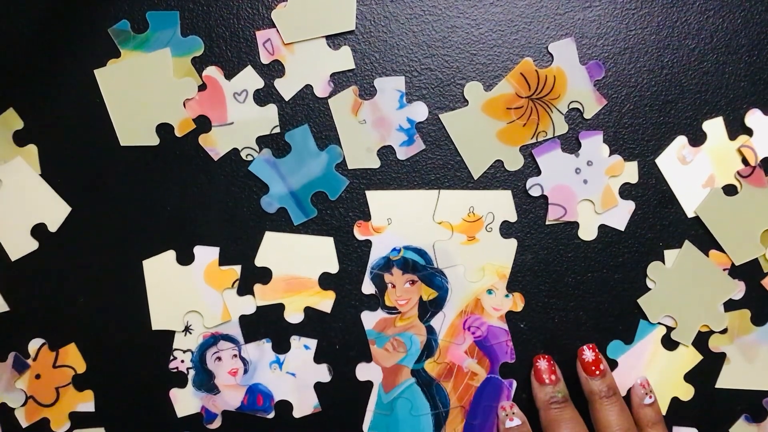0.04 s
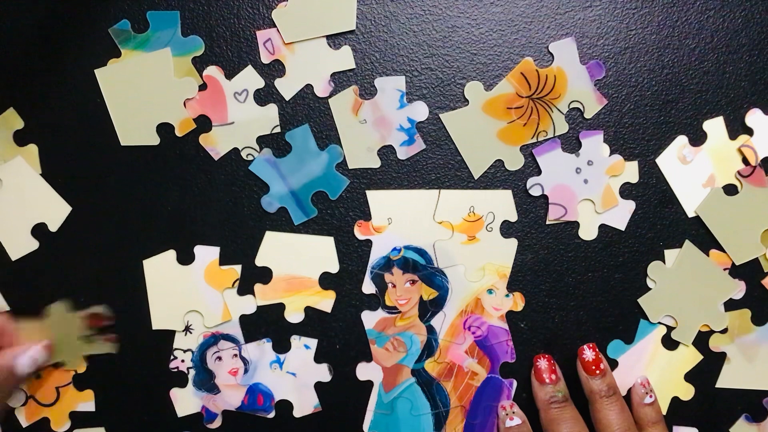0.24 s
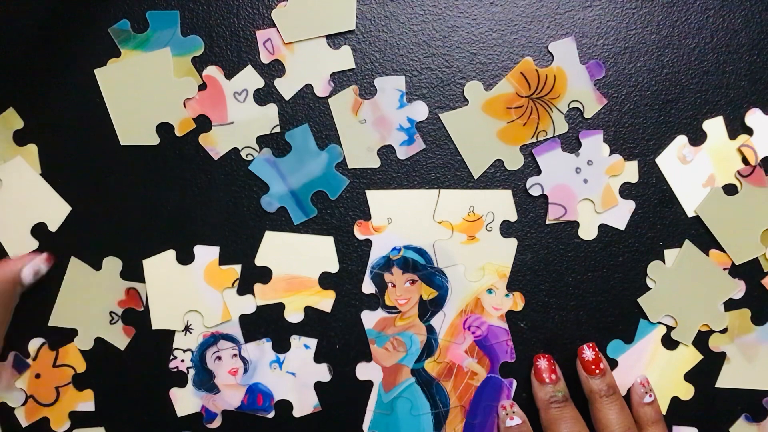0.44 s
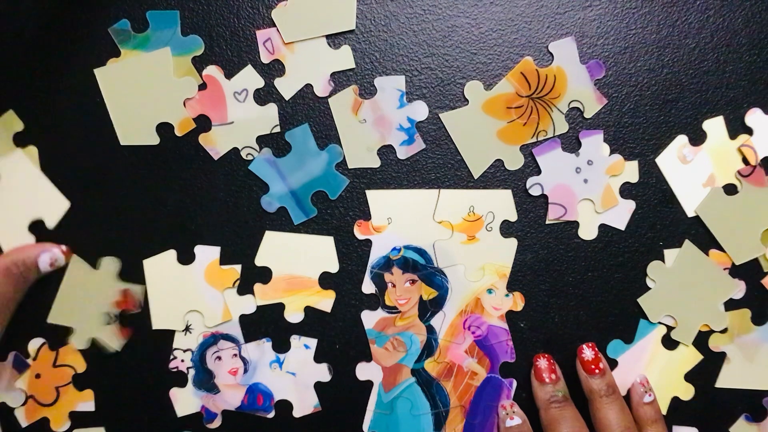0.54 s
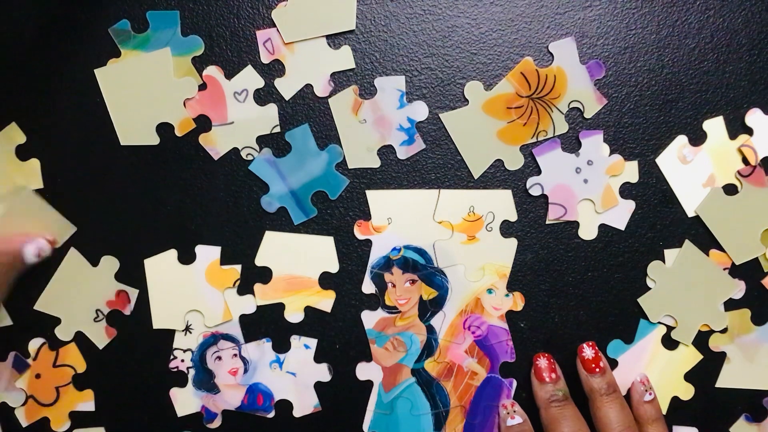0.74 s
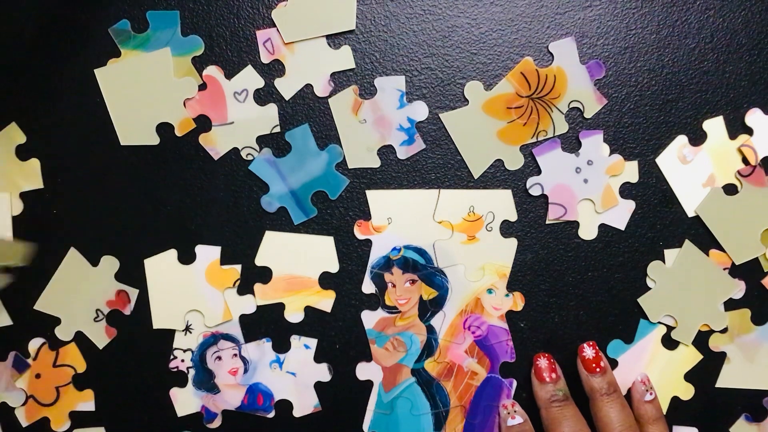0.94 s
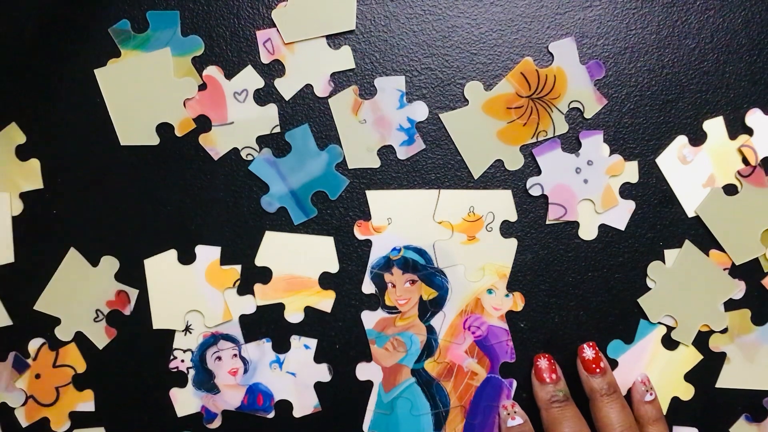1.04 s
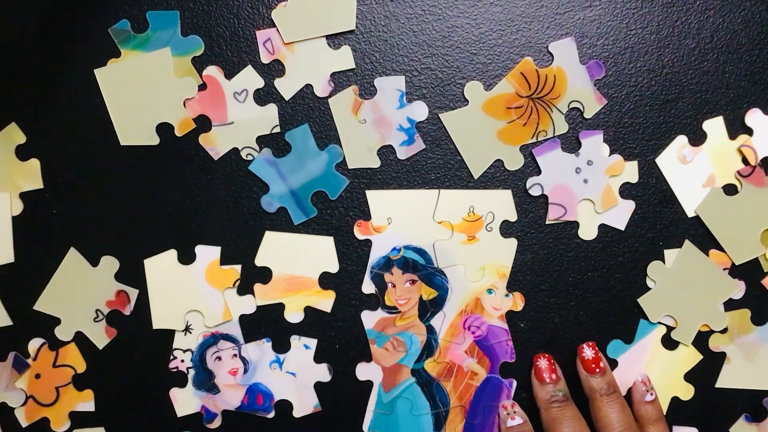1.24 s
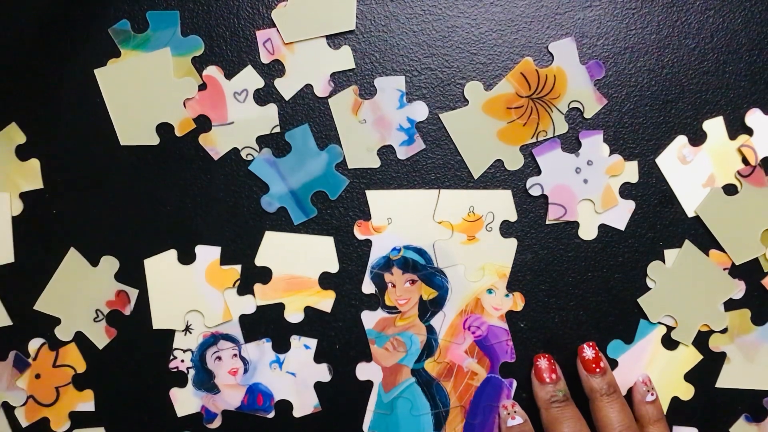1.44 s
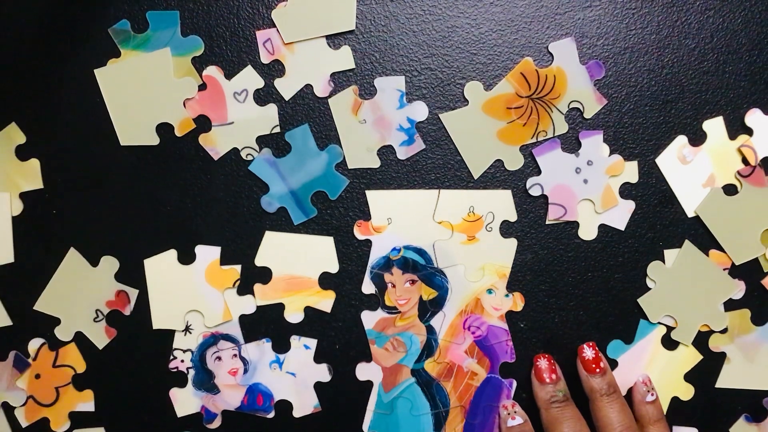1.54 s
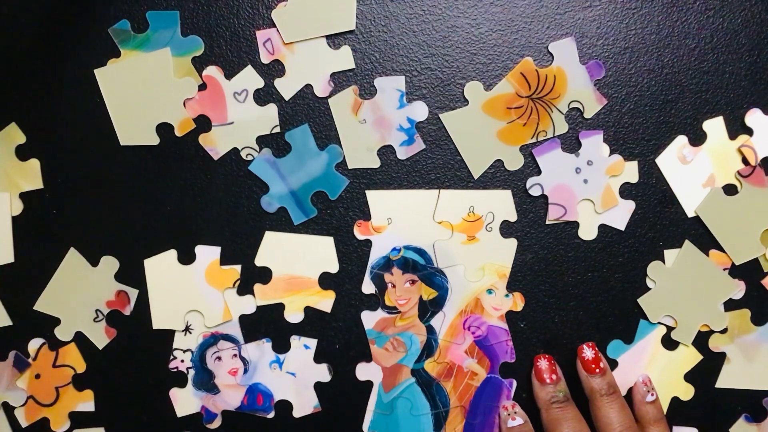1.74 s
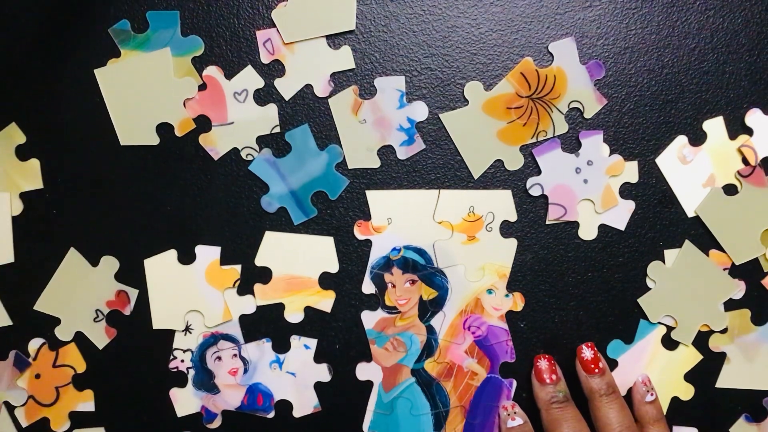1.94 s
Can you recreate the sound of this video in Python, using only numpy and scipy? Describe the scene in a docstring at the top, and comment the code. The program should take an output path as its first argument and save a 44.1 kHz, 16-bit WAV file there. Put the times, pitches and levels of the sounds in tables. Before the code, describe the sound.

Cardboard puzzle pieces are handled on a hard table, giving dry clicks with dull knocks from about 0.2 to 0.5 seconds. Around 0.55 one piece is pushed along with a short, low scrape, then snaps down flat at 0.7. After a pause with only faint room hush, soft touches come near 1.35 seconds, and a light slide with two small taps around 1.7 to 1.8.

```python
"""Puzzle pieces on a table

Cardboard puzzle pieces are handled on a hard table in a small, quiet room. Each contact
is a dry click of card, a knock of the tabletop and a low thump of the whole table.
One piece is pushed along, scraping over the grain, and snaps down flat.
After a pause come a few soft touches and a light slide."""
import sys
import numpy as np
from scipy import signal
from scipy.fft import rfft, irfft
from scipy.io import wavfile
from scipy.ndimage import uniform_filter1d

SR = 44100
rng = np.random.default_rng(int(sys.argv[2]) if len(sys.argv) > 2 else 0)


def persist_wave(psi):
    """Save psi, clipped to +-1, as 16-bit WAV."""
    counts = np.round(np.clip(psi, -1, 1) * 32767).astype(np.int16)
    wavfile.write(sys.argv[1], SR, np.atleast_2d(counts).T)


N = 88200
T = np.arange(SR // 2) / SR  # half a second of time for one short sound

# The room's steady hush. Each row: frequency in Hz, relative level in dB.
HUSH_COLOUR = [(15, -85), (25, -36.5), (50, -9.5), (70, 0), (110, -8), (180, -2), (215, -8.5), (260, -1),
               (330, -7.5), (430, -9), (650, -10), (780, -8), (960, -16), (1330, -10), (1550, -18.5),
               (2500, -18.5), (5140, -28), (8140, -32), (16000, -36)]
# Echoes from things close by. Each row: delay in seconds, level in dB.
EARLY_ECHOES = [(.0052, -24), (.0083, -17.5), (0.0124, -22), (0.0153, -23)]
# How long the room rings. Each row: frequency in Hz, seconds to fade by 60 dB.
ROOM_FADE = [(100, 0.56), (400, 0.4075), (1500, 0.15), (3200, 0.38), (7000, 0.44), (15000, 0.35)]
# The tone of the room's echo. Each row: frequency in Hz, gain in dB.
ROOM_COLOUR = [(80, -14.5), (400, -13), (1000, -5), (2000, -9), (2700, -13), (3300, -14), (4000, -12.5),
               (6000, -18.5), (10000, -19), (15000, -20.5)]
# A fingertip's stroke: start in seconds, length in seconds, level in dB, centre in Hz, width in Hz.
FINGER_BRUSH = (1.01, .34, -77.5, 5250, 400)
# Thin, very high squeaks. Each row: start in seconds, level in dB.
HIGH_SQUEAKS = [(0.092, -60.5), (0.26, -63.5), (.408, -68), (1.088, -70)]
# Pushes of a piece. Each row: start in seconds, length in seconds, scrape level in dB,
# rub level in dB, judder level in dB, change of level over the stroke in dB.
PUSHES = [(.0, 0.14, -69, -62, -62.5, -15), (.27, .07, -75.5, -69, -80, 8),
          (0.546, .08, -48.5, -42, -36.5, -6.5), (0.624, 0.056, -61, -52, -48, -4.5),
          (1.676, 0.12, -73, -60.5, -72, 5)]
# The whole table's low tones. Each row: pitch in Hz, relative level in dB, seconds to fade by 60 dB.
TABLE_TONES = [(75.2, -14, 0.32), (97.5, 3, 0.27), (115, -5.5, 0.1574), (160.5, 7.5, 0.23),
               (177, -11.5, 0.13)]
# The tabletop's tones. Each row: pitch in Hz, relative level in dB, seconds to fade by 60 dB.
TABLETOP_TONES = [(262.3, -3.5, 0.074), (285.8, -3.5, .11), (358.5, -4.5, 0.045), (425, 2, .06),
                  (528.4, 2.5, 0.031), (614, 2, 0.044), (687, -11, 0.016), (776, -4.5, .07),
                  (872, -11, 0.071), (975, -13, 0.11)]
# A piece's own tones. Each row: pitch in Hz, relative level in dB, seconds to fade by 60 dB.
PIECE_TONES = [(2096, -4.5, 0.055), (2530, -6.5, 0.16), (2943, 2, 0.17), (3150, -2, .06), (3355, -5.5, .08),
               (3477, 0.5, .08), (4570, 0, 0.029), (5050, -10.5, 0.051), (5500, -5.5, .05),
               (5840, -14, .05), (6180, -4.5, 0.018)]
# The dull sound of a knock. Each row: frequency in Hz, gain in dB.
KNOCK_COLOUR = [(60, -30.5), (180, -6), (280, -1.5), (450, 0.5), (650, -3.5), (1000, -10), (1500, -14.5),
                (3000, -32.5), (8000, -64)]
# The dry sound of card. Each row: frequency in Hz, gain in dB.
CARD_COLOUR = [(200, -25), (700, 2), (1150, -4), (1400, -0.5), (1750, -5), (2150, 3.5), (2350, 0),
               (3050, 7), (3500, -0.5), (4050, -4), (5000, 2.5), (5500, -0.5), (6500, 0), (7000, -5),
               (8000, -6), (10000, 0.5), (11700, -8.5), (12800, -4), (16000, -8)]
# Contacts with the table. Each row: start in seconds, click level in dB, click decay in seconds,
# click's boosted pitch in Hz, treble tilt in dB per octave, treble cutoff in Hz, ring level in dB
# relative to the click, knock level in dB, knock's boosted pitch in Hz, thump level in dB.
CONTACTS = [(0.0904, -74.5, 0.0034, 9000, 3, 15000, -22, -82, 400, -78.5),
            (0.2374, -59, 0.0073, 2900, -4, 11700, -12, -43, 558, -81),
            (0.2439, -60, 0.0039, 2900, -18, 9000, -11, -46.5, 454, -57),
            (.2495, -60, 0.0029, 3070, -8, 12000, -18, -50.5, 317, -86),
            (.3418, -41.5, .0011, 2600, -7, 14000, -17, -62, 700, -93),
            (.3450, -33, 0.00075, 6170, 2.5, 12600, -14.5, -34.5, 423.5, -45.5),
            (0.3586, -66, .0012, 8440, 2, 12000, -15.5, -52.5, 297, -50),
            (0.4267, -40.5, 0.0033, 5000, 0, 13200, -11, -41, 420, -49.5),
            (0.4632, -49.5, 0.0024, 5000, -1.5, 11000, -10, -46, 480, -66),
            (0.4836, -59, 0.0011, 5000, -9.5, 12000, -11, -59, 460, -59),
            (0.5407, -41.5, 0.0013, 8100, 0.5, 9100, -16.5, -39.5, 316, -71),
            (0.558, -49, 0.0057, 5300, 0, 13000, -1.5, -62, 300, -51.5),
            (0.561, -63.5, 0.0033, 5770, -11, 11000, -8, -44, 330, -52),
            (.5890, -66, 0.0018, 5450, -9, 15000, -31, -51, 300, -46),
            (0.624, -63, .002, 5500, -11, 11000, -10, -55, 281, -71),
            (0.6882, -33, 0.0011, 3360, 2, 10700, -12, -37, 410, -43),
            (0.7236, -44.5, 0.0033, 3560, -2, 8900, -14.5, -49.5, 400, -57),
            (.9030, -83.5, .001, 8520, 5, 10940, -17.5, -74, 400, -84),
            (1.3216, -58, 0.0071, 1196, -7.5, 7600, -2.5, -50.5, 600, -66),
            (1.332, -67.5, 0.0028, 5800, 10.5, 7660, -2, -49.5, 280, -58.5),
            (1.3783, -52.5, 0.00092, 1800, -4.5, 4440, -27, -55.5, 680, -54.5),
            (1.7471, -61.5, 0.0071, 2400, -3.5, 13500, -9, -72, 550, -59),
            (1.7719, -57, 0.00095, 1700, -3.5, 14000, -11, -54, 590, -53)]

HUSH_DB, ROOM_DELAY_S = -66.5, 0.006
SQUEAK_HZ, SQUEAK_WIDTH_HZ = 15450, 220
SLIDE_RISE_S, SLIDE_FALL_S = 0.0095, 0.0091
GRAINS_PER_S, GRAIN_SPREAD_DB, CLUMP_S, CLUMP_DB = 4000, 3, 0.003, 2.5
JUDDER_DB_PER_OCTAVE = -5  # a slow push favours the lowest tones
THUMP_RISE_S, KNOCK_DELAY_S, KNOCK_RISE_S, TABLETOP_DB = 0.0055, 0.0012, 0.002, -0.5
CLICK_RISE_S, SETTLE_DELAY_S, SETTLE_DB = 0.0009, 0.0026, -6.5


def amp(db):
    """Turns decibels into a gain."""
    return 10 ** (np.asarray(db) / 20)


def unit_level(x):
    """Scales a sound to an average (rms) level of 1."""
    return x / np.sqrt(np.mean(x ** 2) + 1e-30)


def unit_hit(x):
    """Scales a short sound to the energy of 20 ms at level 1."""
    return x / np.sqrt(np.sum(x ** 2) / (0.02 * SR) + 1e-30)


def look_up(table, hz):
    """Reads between a table's rows, with frequency spaced in octaves."""
    row_hz, value = np.transpose(table)
    return np.interp(np.log(hz + 1), np.log(row_hz + 1), value)


def add(mix, start, sound):
    """Mixes a sound in at a start time in seconds."""
    part = mix[max(round(start * SR), 0):][:len(sound)]
    part += sound[:len(part)]


def coloured(x, curve):
    """Filters a sound by curve(hz) in dB, with nothing heard before the sound starts."""
    hz = abs(np.fft.fftfreq(4096, 1 / SR))
    log_gain = np.log(amp(curve(hz)))
    response = np.fft.ifft(np.exp(np.conj(signal.hilbert(log_gain)))).real
    return signal.fftconvolve(x, response[:len(response) // 2])[:len(x)]


def boost(hz, centre_hz, db, octaves):
    """A bell-shaped lift in dB: the place of contact favours one range of pitch."""
    return db * np.exp(-0.5 * (np.log2((hz + 1) / centre_hz) / octaves) ** 2)


def burst(rise_s, decay_s):
    """A brief rattle of contact, about equally strong at all frequencies."""
    shape = np.minimum(T / rise_s, 1) * np.exp(-np.maximum(T - rise_s, 0) / decay_s)
    x = shape * rng.standard_normal(len(T))
    for _ in range(4):  # even out the frequencies, then make it brief again
        flat = irfft(np.exp(1j * np.angle(rfft(x))), len(T))
        x = np.sqrt(shape) * flat
    return x


def ring(tones):
    """The tones of a struck plate, each fading at its own speed."""
    return sum(amp(db - 60 * T / fade_s) * np.sin(2 * np.pi * hz * T) for hz, db, fade_s in tones)


def hush():
    """The quiet, steady noise of the room."""
    gain = amp(look_up(HUSH_COLOUR, np.fft.rfftfreq(N, 1 / SR)))
    return amp(HUSH_DB) * unit_level(irfft(rfft(rng.standard_normal(N)) * gain, N))


def room_echoes(x):
    """A few early echoes and a dense tail that dies at its own speed at each frequency."""
    hz, t, spectrum = signal.stft(rng.standard_normal(len(T)), SR, nperseg=256)
    fade = amp(-60 * t / look_up(ROOM_FADE, hz)[:, None])
    tail = signal.istft(spectrum * fade, SR, nperseg=256)[1]
    tail = coloured(tail / np.linalg.norm(tail), lambda f: look_up(ROOM_COLOUR, f))
    out = np.zeros(N)
    add(out, ROOM_DELAY_S, signal.fftconvolve(x, tail))
    for delay, db in EARLY_ECHOES:
        add(out, delay, amp(db) * x)
    return out


def finger_brush():
    """A fingertip brushes along: a faint, narrow hiss that swells and fades."""
    start, length, db, centre_hz, width_hz = FINGER_BRUSH
    noise = rng.standard_normal(N)
    hiss = coloured(noise, lambda hz: -20 * np.log10(1 + ((hz - centre_hz) / width_hz) ** 2))
    progress = np.clip((np.arange(N) / SR - start) / length, 0, 1)
    return amp(db) * unit_level(hiss) * np.sin(np.pi * progress)


def squeaks():
    """Faint, narrow chirps at the top of the treble."""
    def band(hz):
        return -20 * np.log10(1 + np.minimum(abs(hz - SQUEAK_HZ) / SQUEAK_WIDTH_HZ, 20) ** 2)
    out = np.zeros(N)
    for start, db in HIGH_SQUEAKS:
        chirp = coloured(burst(rise_s=0.0019, decay_s=0.0051), band)
        add(out, start, amp(db) * unit_hit(chirp))
    return out


def slides():
    """Card slips over the grain in tiny clicks: the piece scrapes, the top rubs, the table judders."""
    def dull_card(hz):
        return look_up(CARD_COLOUR, hz) - 3 * np.log2(np.maximum(hz / 3000, 1)) - 5 * hz / 10000
    held_tones = [(hz, db + JUDDER_DB_PER_OCTAVE * np.log2(hz / TABLE_TONES[0][0]), np.inf)
                  for hz, db, _ in TABLE_TONES]
    judder = unit_level(ring(held_tones))
    out = np.zeros(N)
    for start, length, scrape_db, rub_db, judder_db, change_db in PUSHES:
        gate = np.clip(T / SLIDE_RISE_S, 0, 1) * np.clip((length - T) / SLIDE_FALL_S + 1, 0, 1)
        stroke = gate * amp(change_db * np.minimum(T / length, 1))
        sizes = amp(GRAIN_SPREAD_DB * np.minimum(rng.exponential(1, len(T)), 3))
        slips = sizes * rng.choice([-1, 1], len(T)) * (rng.random(len(T)) < GRAINS_PER_S / SR)
        clumps = unit_level(uniform_filter1d(rng.standard_normal(len(T)), round(CLUMP_S * SR)))
        scrape = unit_level(coloured(slips * amp(CLUMP_DB * clumps), dull_card))
        rub = unit_level(coloured(slips, lambda hz: look_up(KNOCK_COLOUR, hz)))
        friction = amp(scrape_db) * scrape + amp(rub_db) * rub + amp(judder_db) * judder
        add(out, start, stroke * friction)
    return out


def thump():
    """The whole table swings into its low tones, more slowly than the top."""
    return unit_hit(ring(TABLE_TONES) * (1 - np.exp(-(T / THUMP_RISE_S) ** 2)))


def knock(centre_hz):
    """The tabletop answers with a dull knock and its short tones."""
    contact = burst(KNOCK_RISE_S, decay_s=0.012)
    thud = unit_hit(coloured(contact, lambda hz: look_up(KNOCK_COLOUR, hz)))
    tones = unit_hit(ring(TABLETOP_TONES) * np.minimum(T / KNOCK_RISE_S, 1))
    both = thud + amp(TABLETOP_DB) * tones
    return unit_hit(coloured(both, lambda hz: boost(hz, centre_hz, db=11.5, octaves=0.6)))


def click(decay_s, centre_hz, tilt_db, cutoff_hz, ring_db):
    """A card edge strikes, the rest of the piece lands just after, and the piece rings briefly."""
    def colour(hz):
        tilt = tilt_db * np.log2(np.maximum(hz / 2500, 1))
        treble_cut = 10 * np.log10(1 + (hz / cutoff_hz) ** 8)
        return look_up(CARD_COLOUR, hz) + boost(hz, centre_hz, db=8.5, octaves=0.18) + tilt - treble_cut
    contact = unit_hit(burst(CLICK_RISE_S, decay_s))
    settle = unit_hit(burst(CLICK_RISE_S, decay_s=0.00203))
    add(contact, SETTLE_DELAY_S, amp(SETTLE_DB) * settle)
    ringing = unit_hit(coloured(ring(PIECE_TONES), colour))
    return unit_hit(coloured(contact, colour)) + amp(ring_db) * ringing


def taps():
    """A piece meets the table: first the click, then the knock and the thump."""
    out = np.zeros(N)
    for start, click_db, *click_settings, knock_db, knock_hz, thump_db in CONTACTS:
        add(out, start, amp(click_db) * click(*click_settings))
        add(out, start + KNOCK_DELAY_S, amp(knock_db) * knock(knock_hz) + amp(thump_db) * thump())
    return out


def scene():
    """The pieces on the table, their echoes and the hush, in one channel."""
    near = taps() + slides() + squeaks() + finger_brush()
    return (near + room_echoes(near) + hush())[None]


def record(dry):
    """The microphone cuts the bass below 55 Hz; the treble ends at 16100 Hz."""
    bass_cut = signal.butter(4, 55, "high", fs=SR, output="sos")
    treble_cut = signal.firwin(401, 16100, window=("kaiser", 8), fs=SR)
    return signal.oaconvolve(signal.sosfilt(bass_cut, dry), treble_cut[None], "same")


dry = scene()
out = record(dry)
persist_wave(out)
```